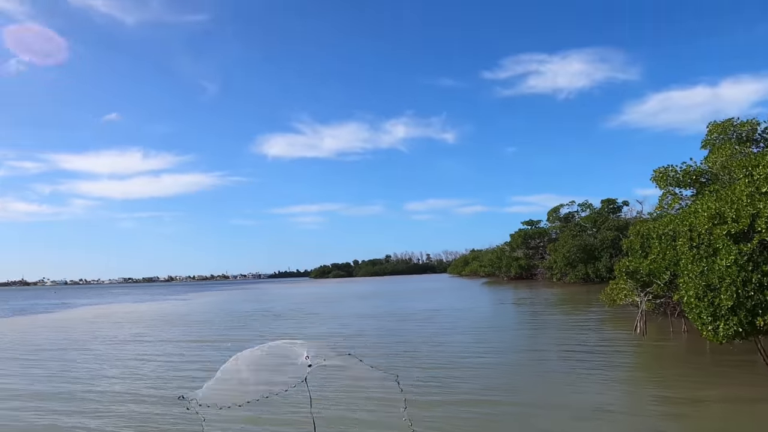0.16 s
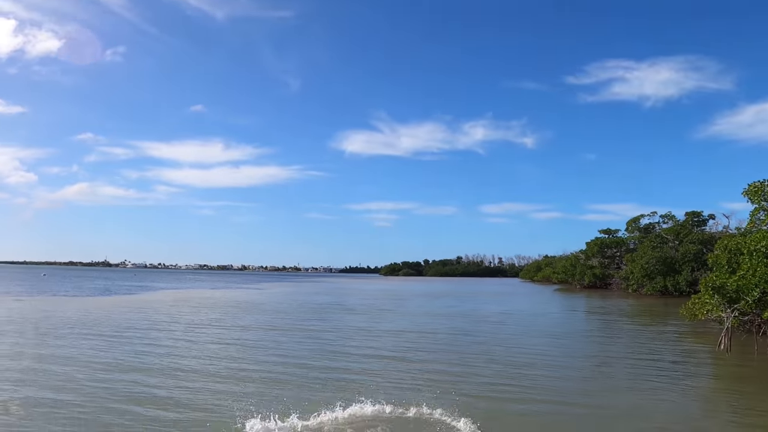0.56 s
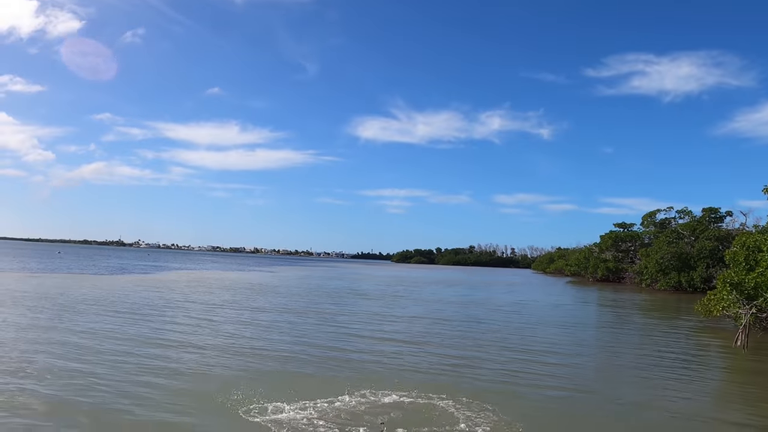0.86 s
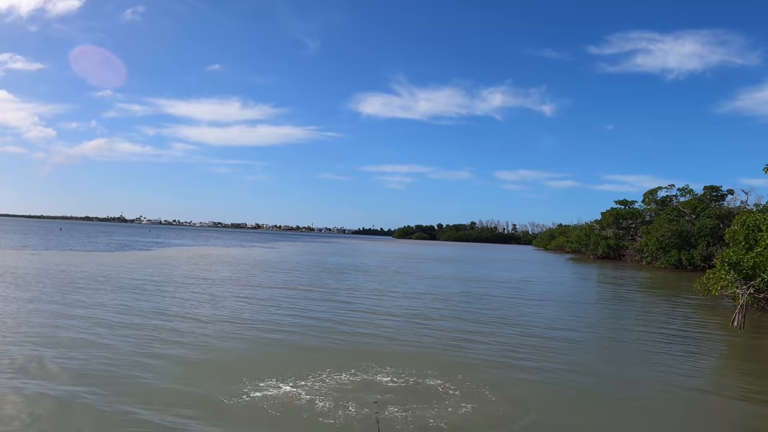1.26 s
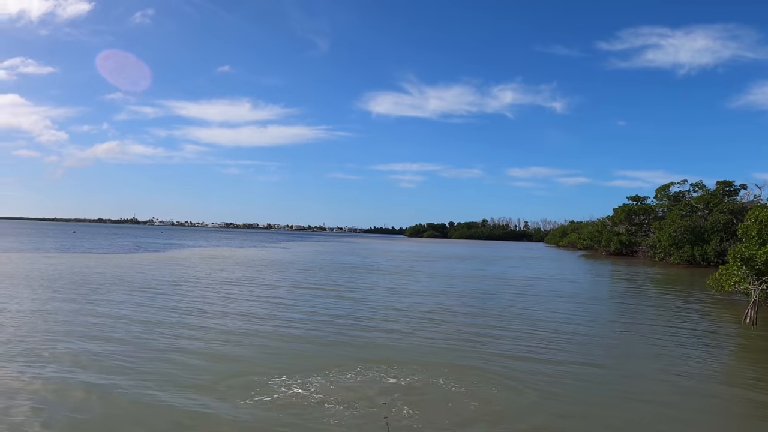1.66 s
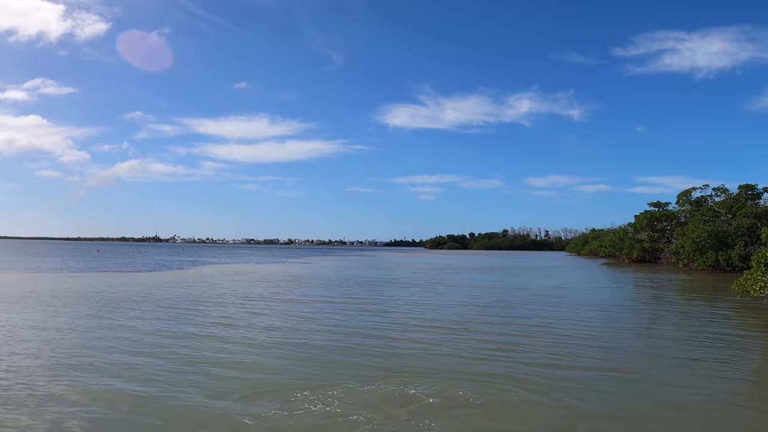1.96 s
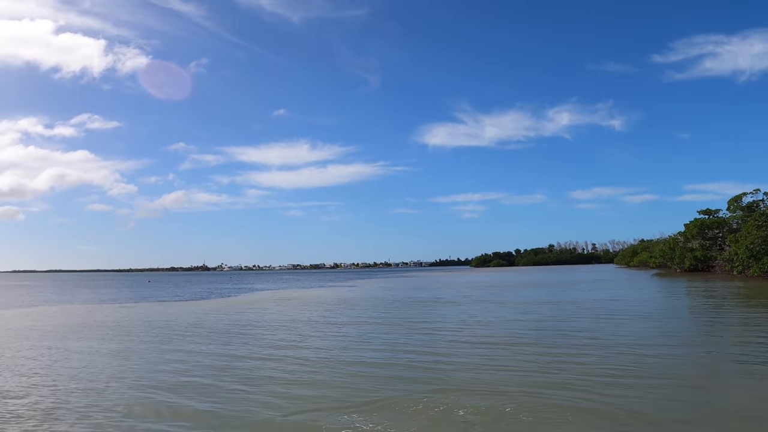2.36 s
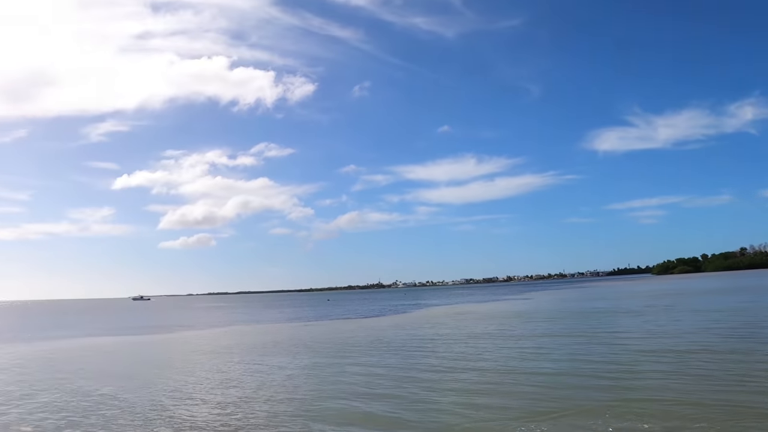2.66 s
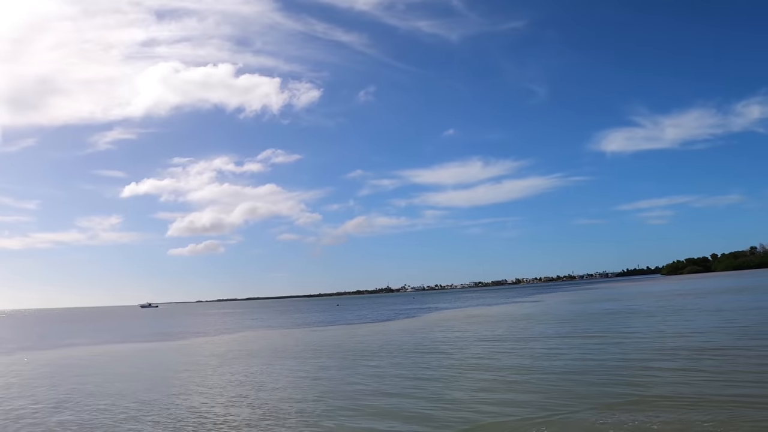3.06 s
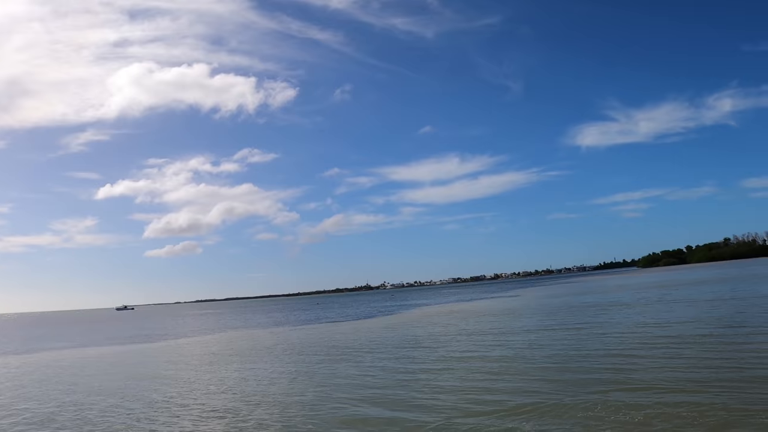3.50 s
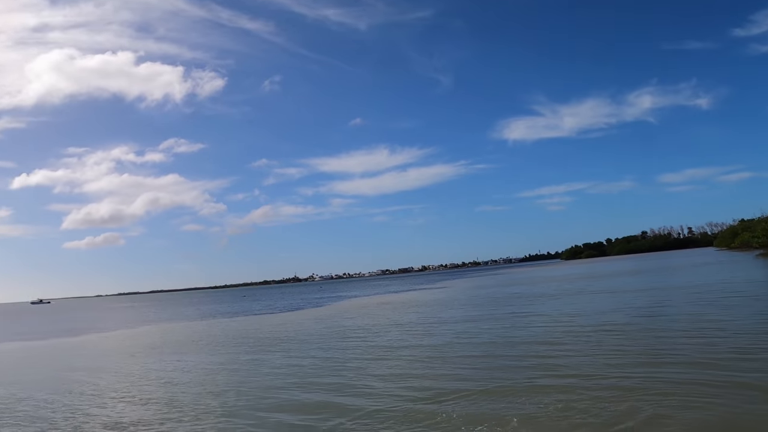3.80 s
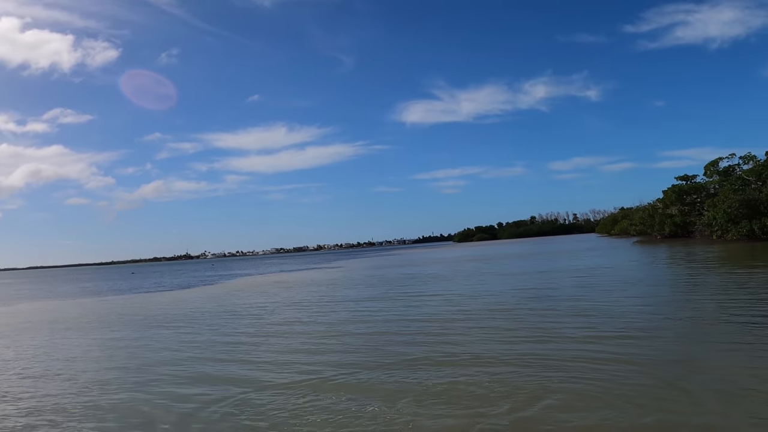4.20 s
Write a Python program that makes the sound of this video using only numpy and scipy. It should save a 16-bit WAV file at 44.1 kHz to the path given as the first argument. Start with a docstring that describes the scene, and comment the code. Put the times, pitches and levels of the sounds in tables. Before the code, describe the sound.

A weighted cast net slaps onto shallow water with a gulping splash, spray patters back, then a wet line drips and ticks close by.

```python
"""Cast net on a shallow bay

A wet hand line rubs by stick-slip as it runs out; a weighted rim then slaps the water (shaped noise and short tones).
Air pockets gulp as pulsating bubbles, spray rains back as random grains, and foam fizzes away.
Afterwards the line drips, squelches and ticks close by: gliding tones and filtered noise bursts.
Behind it wavelets clop under the bow, ripples lap, and a light breeze rumbles on the microphone as low noise."""
import sys
import numpy as np
from scipy import signal
from scipy.io import wavfile
from scipy.ndimage import map_coordinates

SR = 44100
rng = np.random.default_rng(int(sys.argv[2]) if len(sys.argv) > 2 else 0)


def store_wav(level_fs):
    """Save 16-bit WAV to argv[1]."""
    pcm = np.round(np.clip(np.atleast_2d(level_fs), -1, 1) * 32767)
    wavfile.write(sys.argv[1], SR, pcm.T.astype(np.int16))


N = 191379
TIME = np.arange(N) / SR   # s


def from_db(db):
    """Level to amplitude: 20 dB is a factor of ten."""
    return 10 ** (np.asarray(db) / 20)


def rms_one(x):
    """Power normalisation: scale to unit rms."""
    return x / np.sqrt(np.mean(x ** 2) + 1e-20)


def at_hz(points, hz):
    """Spectral interpolation on a log-frequency axis."""
    f, value = np.transpose(points)
    return np.interp(np.log(hz), np.log(f), value)


def drift(rate):
    """Low-passed noise: a slow random modulation of unit spread, faster for a higher rate."""
    # computed at every 40th sample; the first 2000 values let the filter settle
    r = np.exp(-80 * np.pi * rate / SR)
    slow = signal.lfilter([1], [1, -2 * r, r * r], rng.standard_normal(N // 40 + 2002))[2000:]
    return np.interp(np.arange(N) / 40, np.arange(len(slow)), rms_one(slow))


def band(x, low, high):
    """Band-pass filtering with a maximally flat response."""
    sos = signal.butter(2, [low, min(high, .45 * SR)], "band", fs=SR, output="sos")
    return signal.sosfilt(sos, x + 1e-18)


def add(out, s, sound):
    """Superposition: mix a short sound in at time s."""
    i = max(int(s * SR), 0)
    out[i:i + len(sound)] += sound[:N - i]


def chance_times(gain, per_s):
    """Random arrivals: sample indices, per_s a second where the gain is highest, fewer where it is low."""
    return np.flatnonzero(rng.random(N) < per_s * gain / gain.max() / SR)


def envelope(s, rise, hold, fade_db_per_s):
    """Exponential decay: a gain that rises, holds and then fades evenly in dB."""
    return np.clip((TIME - s) / rise, 0, 1) * from_db(-fade_db_per_s * np.maximum(TIME - s - rise - hold, 0))


def swells(rows):
    """Bell-shaped modulation: the summed gain of swells (t/s, half length/s, level/dB)."""
    return sum(from_db(db) * np.exp(-((TIME - s) / half) ** 2) for s, half, db in rows)


def grains(per_s, spread_db):
    """Shot noise: random clicks of uneven size."""
    sizes = from_db(spread_db * np.minimum(rng.exponential(1, N), 4)) * rng.choice([-1, 1], N)
    return sizes * (rng.random(N) < per_s / SR)


# likeness of the left and right channels: (f/Hz, likeness, 1 = identical)
LIKENESS = [(30, 1), (2000, 1), (4000, 1), (9000, 0.98), (13000, 0.88)]


def texture(colour, patchy_db, flicker=12, per_s=None, spread_db=0):
    """Third-octave synthesis: stereo noise, or shot noise of per_s grains in the 1 kHz band; rms 1."""
    out = np.zeros((2, N))
    for hz in 1000 * 2 ** (np.arange(-17, 12) / 3):
        if not colour[0][0] <= hz <= colour[-1][0]:
            continue
        if per_s is None:
            drive = rng.standard_normal(N)
        else:
            drive = grains(per_s * np.sqrt(hz / 1000), spread_db)   # higher bands have more grains
        mid = rms_one(band(drive, hz / 2 ** (1 / 6), hz * 2 ** (1 / 6)))
        alike = np.clip(at_hz(LIKENESS, hz), 0, 1)
        side = np.sqrt(1 - alike) * np.roll(mid, N // 3) * [[1], [-1]]   # opposite sign in the two channels
        gain = np.sqrt(hz) * from_db(at_hz(colour, hz) + patchy_db * drift(flicker))
        out += gain * (np.sqrt(1 + alike) * mid + side)
    return rms_one(out)


def bubble(hz, swell, t60, rise):
    """Bubble resonance: it swells, rings and dies, its pitch rising by at most an octave near the surface."""
    t = TIME[:SR // 5]
    shape = (1 - np.exp(-(t / swell) ** 2)) * from_db(-60 * t / t60)
    pitch = hz * 2 ** np.minimum(rise * t, 1)
    return shape / shape.max() * np.sin(2 * np.pi * np.cumsum(pitch) / SR)


# stretches of the weighted rim hitting the water: (t/s, relative level/dB, length/s)
SLAPS = [(0.452, -21.5, 0.015), (0.467, -19.5, 0.033), (0.501, -27.5, 0.028), (0.527, -21.3, 0.034),
         (0.55, -25.5, 0.028), (0.578, -25.7, 0.023), (0.606, -30, 0.015)]
SLAP_SPRAY_DECAY_S = 0.025


def rim_impact():
    """Impact excitation: gains of the rim's slaps and of the spray each one tears off."""
    impact, torn = np.zeros(N), np.zeros(N)
    for s, db, length in SLAPS:
        age = np.maximum(TIME - s, 0)
        onset = from_db(db) * (1 - np.exp(-age / .002))
        impact += onset * np.exp(-(age / length) ** 4)
        torn += onset * np.exp(-age / SLAP_SPRAY_DECAY_S)
    return impact, torn


# spectrum of a slap: (f/Hz, relative density level/dB)
SLAP_COLOUR = [(110, -37), (180, -2), (209, -14), (256, 3), (325, -0.5), (480, -2.5), (645, 1), (777, -3.5),
               (1150, -6.5), (1500, -11.5), (2190, -15.5), (2900, -18), (4420, -28), (7700, -32.5),
               (8930, -26.5), (15000, -79)]


def rim_slaps(impact):
    """Broadband impact noise: the rim slaps down stretch by stretch."""
    return from_db(-4.0) * impact * texture(SLAP_COLOUR, patchy_db=3.0, per_s=2000, spread_db=1.5)


WEIGHTS_PER_S, WEIGHT_DB = 520, -4   # rate at the hardest impact; level relative to the impact gain
WEIGHT_HZ, WEIGHT_OCTAVES = 1300, 0.8   # centre; pitches lie up to 1.5 times this spread either side


def weights(impact):
    """Damped resonance: each lead weight punches its own small hole, a short plop of a few cycles."""
    out, t = np.zeros(N), TIME[:SR // 25]
    cycles = 2.2
    for i in chance_times(impact, WEIGHTS_PER_S):
        hz = WEIGHT_HZ * 2 ** (WEIGHT_OCTAVES * rng.uniform(-1.5, 1.5))
        plop = np.exp(-t * hz / cycles) * np.sin(2 * np.pi * hz * t)
        add(out, i / SR, impact[i] * rng.uniform(0.39, 1) * plop)
    return from_db(WEIGHT_DB) * out


# air pockets dragged under by the net: (t/s, f/Hz, relative peak level/dB, t60/s)
GULPS = [(.453, 587, -26.5, 0.023), (.467, 645, -24.5, .05), (.483, 1170, -23.5, 0.061),
         (.509, 346, -21.5, 0.027), (.528, 405, -23, .055), (0.550, 337, -21, 0.088), (.562, 488, -27, .06),
         (.583, 575, -22.5, 0.058), (.586, 1126, -23.5, 0.037), (0.607, 430, -23.5, .055),
         (.67, 620, -31, .03), (0.65, 205, -18, 0.03), (.696, 224, -17, 0.026), (0.71, 150, -26, 0.03),
         (.72, 1050, -25, 0.03), (.747, 900, -21.5, 0.024), (.77, 520, -32, .03), (.824, 1080, -30, .022),
         (.785, 186, -33, 0.045), (.839, 240, -33, 0.037), (.89, 367, -37, 0.044),
         (1.089, 1080, -35, 0.037)]
GULP_SWELL_CYCLES, GULP_OCTAVES_PER_S = 1.28, 1.2   # bigger pockets are slower


def gulps(wobble=0.05, rough_db=2.0):
    """Bubble resonance: big air pockets ring unevenly; the lower the note, the slower it swells."""
    out = np.zeros(N)
    for s, hz, db, t60 in GULPS:
        pitch = hz * (1 + wobble * drift(66)[:SR // 5])
        rough = rough_db * drift(87)[:SR // 5]
        add(out, s, from_db(db + rough) * bubble(pitch, GULP_SWELL_CYCLES / hz, t60, GULP_OCTAVES_PER_S))
    return from_db(-0.5) * out


# spectra of the bubbles and of the fine spray: (f/Hz, relative density level/dB)
BUBBLE_COLOUR = [(100, -22), (170, -4.5), (227, -7), (407, -3.5), (480, -1), (904, -1.5), (1440, -4.5),
                 (1720, -8.5), (3500, -17.5), (4550, -49), (7700, -120)]
SPRAY_COLOUR = [(1000, -27), (1700, -2.5), (2360, -6.5), (2900, -4.7), (4230, -11), (5260, -17),
                (7110, -17), (7710, -21.5), (8920, -21.5), (11000, -29.5), (15000, -53)]
SKIM_S, SKIM_HOLD_S = 0.382, 0.025   # the lowest weights skim the surface ahead of the rim
SKIM_BUBBLE_DB, SKIM_SPRAY_DB = -37.5, -36.5   # its gurgle and hiss, relative levels
SLAP_SPRAY_DB = -10   # spray torn off by each slap, relative level
FALLBACK_S, FALLBACK_RISE_S = 0.585, 0.1   # the thrown water starts to rain back
PATTER_DB, PATTER_HOLD_S, PATTER_FADE_DB_PER_S = -35.8, 0.11, 54   # bubbles that it makes
SPRAY_DB, SPRAY_HOLD_S, SPRAY_FADE_DB_PER_S = -41.5, 0.19, 50   # its fine spray, relative level


def bubbles_and_spray(torn, skim_fade_db_per_s=130, churn_db=-13):
    """Shot noise: the skim, the slaps and the falling water each make fine bubbles and spray."""
    skim = envelope(SKIM_S, .014, SKIM_HOLD_S, skim_fade_db_per_s)
    patter = from_db(PATTER_DB) * envelope(FALLBACK_S, FALLBACK_RISE_S, PATTER_HOLD_S, PATTER_FADE_DB_PER_S)
    mist = from_db(SPRAY_DB) * envelope(FALLBACK_S, FALLBACK_RISE_S, SPRAY_HOLD_S, SPRAY_FADE_DB_PER_S)
    bubble_gain = from_db(SKIM_BUBBLE_DB) * skim + from_db(churn_db) * torn + patter
    spray_gain = np.hypot(from_db(SKIM_SPRAY_DB) * skim, from_db(SLAP_SPRAY_DB) * torn) + mist
    bubbles = bubble_gain * texture(BUBBLE_COLOUR, patchy_db=1.5, flicker=25, per_s=220, spread_db=2.0)
    spray = spray_gain * texture(SPRAY_COLOUR, patchy_db=1.2, flicker=25, per_s=170, spread_db=1.6)
    return bubbles + from_db(-2.5) * spray


# heavy drops are thrown highest and start to land later than the spray
HEAVY_S, HEAVY_RISE_S, HEAVY_HOLD_S, HEAVY_FADE_DB_PER_S = 0.62, 0.1, 0.17, 55
HEAVY_PER_S, HEAVY_DB, HEAVY_HZ, HEAVY_OCTAVES = 520, -35.8, 1750, 0.85


def heavy_drops(spread_db=3.5):
    """Damped resonance: heavy drops rain back, each a short plip; on average later ones sound lower."""
    cycles, deepening_octaves_per_s = 2.5, 0.8
    out, t = np.zeros(N), TIME[:SR // 40]
    shower = envelope(HEAVY_S, HEAVY_RISE_S, HEAVY_HOLD_S, HEAVY_FADE_DB_PER_S)
    for i in chance_times(np.sqrt(shower), HEAVY_PER_S):
        size, strength = np.clip(rng.standard_normal(2), -2, 1.5)
        deepening = deepening_octaves_per_s * (i / SR - HEAVY_S - HEAVY_RISE_S)
        hz = HEAVY_HZ * 2 ** (HEAVY_OCTAVES * size - deepening)
        age = t * hz / cycles
        plip = (1 - np.exp(-3 * age)) * np.exp(-age) * np.sin(2 * np.pi * hz * t)
        add(out, i / SR, shower[i] ** 0.75 * from_db(spread_db * strength) * plip)
    return from_db(HEAVY_DB) * out


# spectrum of the foam: (f/Hz, relative density level/dB)
FOAM_COLOUR = [(1180, -31), (2000, -4), (2760, -3.5), (5100, -2), (6090, 1), (7770, -1.5), (8750, 2.5),
               (9920, -5.5), (13400, -13.5), (15000, -26)]
FOAM_S, FOAM_RISE_S, FOAM_HOLD_S, FOAM_DB, FOAM_FADE_DB_PER_S = 0.93, 0.3, 0.4, -67.5, 10


def foam(fizz_per_s=1500):
    """Dense shot noise: the foam left behind fizzes and fades."""
    gain = from_db(FOAM_DB) * envelope(FOAM_S, FOAM_RISE_S, FOAM_HOLD_S, FOAM_FADE_DB_PER_S)
    return gain * texture(FOAM_COLOUR, patchy_db=-0.1, per_s=fizz_per_s, spread_db=1.5)


# the line slips through the hand in jerks: (t/s, relative peak level/dB)
RUBS = [(0.026, -37.5), (0.081, -35.5), (0.113, -32), (0.122, -32), (0.13, -29), (0.14, -30.5),
        (0.179, -29), (0.195, -28), (0.206, -28.5), (0.211, -31), (0.219, -35), (0.326, -41), (0.353, -32),
        (2.074, -46), (2.088, -42)]
# between jerks the line drags on: (t/s, half length/s, relative level/dB)
DRAGS = [(0.103, 0.012, -46), (0.14, 0.014, -41), (0.185, 0.016, -41), (0.211, 0.014, -38),
         (2.124, 0.012, -58)]
# modes of the taut line's creak: (f/Hz, level relative to its jerk/dB, t60/s)
CREAK = [(270, -7, 0.04), (580, -6, 0.035), (1050, -13, 0.04), (1370, -7, 0.04), (1760, -11, 0.04)]
# spectrum of the scrape: (f/Hz, relative density level/dB)
RUB_COLOUR = [(160, 8), (250, 5), (450, 4), (700, -5), (1100, -3), (1600, -4.5), (2100, -21), (4000, -27.5),
              (7000, -26), (12000, -55)]


def line_rubs(decay=0.0055, swell=0.001, scrape_db=-0.5, creak_db=0, detune=0.035):
    """Stick-slip friction: the line drags and slips in short rough jerks, each exciting damped creaky modes."""
    jerks, creak, t = np.zeros(N), np.zeros(N), TIME[:SR // 12]
    onset = 1 - np.exp(-(t / swell) ** 2)
    for s, db in RUBS:
        add(jerks, s, from_db(db) * onset * np.exp(-t / decay))
        for hz, mode_db, t60 in CREAK:
            phase = 2 * np.pi * (hz * rng.normal(1, detune) * t + rng.random())
            ringing = onset * np.exp(-np.log(1000) * t / t60)
            add(creak, s, from_db(db + mode_db) * ringing * np.sin(phase))
    scrape = np.hypot(jerks, swells(DRAGS)) * texture(RUB_COLOUR, patchy_db=0.5)
    return from_db(scrape_db) * scrape + from_db(creak_db) * creak


# pulls that gather the wet line: (t of fastest pull/s, half length/s, relative level/dB)
PULLS = [(2.69, 0.13, -65), (2.98, 0.071, -70), (3.64, 0.11, -66.5), (3.96, 0.14, -61.5),
         (4.21, 0.084, -65)]
HELD_LINE_DB = -80.5   # the line creeps between pulls, relative level


def pulling():
    """Amplitude control by sliding: a slow creep with pulls on top."""
    return swells(PULLS) + from_db(HELD_LINE_DB) * np.interp(TIME, [2.2, 2.5], [0, 1])


# the sharpest wet ticks of the line: (t/s, relative peak level/dB, f/Hz, bandwidth as a ratio, at least 1.1)
TICKS = [(0.258, -37, 4300, 1.25), (1.929, -53, 2300, 2.1), (2.211, -49, 1800, 1.6),
         (2.468, -53.5, 4550, 1.15), (2.487, -47.5, 7500, 1.4), (2.632, -50, 2960, 1.4),
         (2.667, -49, 5160, 0.82), (2.687, -49.5, 7500, 1.2), (2.712, -50, 5500, 1),
         (2.732, -48, 6560, 1.6), (2.89, -56.5, 4500, 1.5), (2.939, -42, 2950, 1.22),
         (2.958, -54.5, 5500, 1.6), (3.674, -51.5, 4200, 1.23), (3.851, -48, 3330, 1.3),
         (3.857, -43.5, 3450, 1), (3.883, -44.5, 3020, 2), (3.924, -42.5, 5000, 1.6),
         (3.957, -45, 3600, 1.4), (3.981, -47, 3700, 1.5), (4.02, -45.5, 3600, 1.7),
         (4.046, -50, 4200, 1.4), (4.066, -53, 3500, 1.5), (4.079, -51.5, 5000, 1.2),
         (4.152, -36.5, 3600, 2.2), (4.16, -43.5, 6980, 1.5), (4.193, -45.5, 3430, 1.25),
         (4.228, -43, 3400, 2.3), (4.29, -52, 1800, 1.5)]
# spectrum of the wet line and mesh: (f/Hz, relative density level/dB)
GATHER_COLOUR = [(700, -4), (1300, 7.5), (1900, -8), (2900, 1.5), (5000, -7), (7000, -9.5), (9500, -11.5),
                 (14000, -37)]
PULL_TICKS_PER_S, PULL_TICK_DB = 75, 7   # rate at full pull; level above the pulling gain
TICK_RING_DB, TICK_RING_HZ, TICK_RING_T60_S = -15, 1230, 0.03   # each tick leaves a short hollow ring


def wet_line(swell=0.00036, decay=0.00084, tail_db=-25, tail=0.011, snap_db=-15,
             small_tick_hz=3900, small_tick_width=1.45):
    """Impulsive excitation: films of water snap on the line, single ticks over a fine crackling hiss."""
    out, t, pull = np.zeros(N), TIME[:SR // 20], pulling()
    hiss = pull * texture(GATHER_COLOUR, patchy_db=4.0, flicker=28.0, per_s=400, spread_db=2.5)
    small = []
    for i in chance_times(pull, PULL_TICKS_PER_S):
        db = 20 * np.log10(pull[i]) + PULL_TICK_DB
        small.append((i / SR, db, small_tick_hz * 2 ** rng.uniform(-0.47, 0.81), small_tick_width))
    shape = (1 - np.exp(-(t / swell) ** 2)) * (np.exp(-t / decay) + from_db(tail_db) * np.exp(-t / tail))
    ring_shape = from_db(TICK_RING_DB) * np.exp(-np.log(1000) * t / TICK_RING_T60_S)
    for s, db, hz, width in list(TICKS) + small:
        burst = rng.standard_normal(len(t)) * shape
        ratio = max(width, 1.1)
        tick = band(burst, hz / ratio, hz * ratio) + from_db(snap_db) * band(burst, 1040, 10000)
        ring = ring_shape * np.sin(2 * np.pi * TICK_RING_HZ * rng.normal(1, 0.073) * t)
        add(out, s, from_db(db) * (tick / np.abs(tick).max() + ring))
    return out + from_db(-2.0) * hiss


# partials of a short squeaky squelch, each gliding, then late swelling drips that chirp upward:
# (t/s, length/s, start f/Hz, end f/Hz, relative level/dB)
SQUELCH = [(2.259, 0.031, 548, 720, -44.5), (2.26, 0.04, 1090, 1750, -46.5),
           (2.272, 0.038, 1500, 2050, -52.5), (2.29, 0.022, 850, 1080, -41),
           (2.303, 0.027, 1350, 1620, -44.5), (2.308, 0.018, 1020, 940, -45.5),
           (2.27, 0.036, 3250, 3780, -57.5), (2.297, 0.027, 3330, 3620, -56),
           (2.264, 0.06, 3000, 2920, -62), (2.268, 0.028, 4050, 4300, -63.5),
           (2.276, 0.04, 4700, 5080, -67), (2.292, 0.026, 5950, 6100, -68), (4.138, .026, 920, 1450, -55),
           (4.302, .027, 680, 1250, -54)]


def squelch_and_late_drips(waver=0.03, overtone_db=-26, rasp_db=-27, slosh_db=-11.5, slosh_decay_s=0.021,
                           fullness=0.7, sputter_db=2.5):
    """Frequency modulation: gliding tones swell and sputter, rasp on every cycle and leave a slosh."""
    out, t = np.zeros(N), TIME[:SR // 8]
    for s, length, start_hz, end_hz, db in SQUELCH:
        u = np.minimum(t / length, 1)
        pitch = start_hz * (end_hz / start_hz) ** u * (1 + waver * drift(260)[:len(u)])
        phase = 2 * np.pi * np.cumsum(pitch) / SR
        sputter = from_db(sputter_db * drift(160)[:len(u)]) * np.abs(np.sin(np.pi * u)) ** fullness
        rasp = rms_one(band(rng.standard_normal(len(u)), 2900, 6700) * (1 + np.sin(phase)))
        tone = np.sin(phase) + from_db(overtone_db) * np.sin(2 * phase)
        slosh_shape = u * np.exp(-np.maximum(t - length, 0) / slosh_decay_s)
        slosh = rms_one(band(rng.standard_normal(len(u)), 270, 1500)) * slosh_shape
        add(out, s, from_db(db) * (sputter * (tone + from_db(rasp_db) * rasp) + from_db(slosh_db) * slosh))
    return from_db(-1.2) * out


# drips whose bubble surfaces, mostly chirping upward:
# (t/s, f/Hz, peak level/dB, length/s, rise/octaves, lateness of the rise: 1 = even)
DRIPS = [(2.21, 1130, -50, 0.046, 1.0, 3), (2.632, 1240, -48, 0.022, -0.085, 0.79),
         (2.958, 1066, -54.5, 0.039, 0.86, 4.5), (3.053, 1196, -58.5, 0.039, 1.35, 2.7),
         (3.12, 1500, -60.5, 0.036, .55, 0.72), (3.985, 1190, -51, .04, .25, .7)]


def drips(fade_db=10, waver=0.032):
    """Frequency-modulated bubble resonance: a wobbly note, most often rising as it reaches the surface."""
    out = np.zeros(N)
    for s, hz, db, length, rise, lateness in DRIPS:
        u = np.linspace(0, 1, int(length * SR))
        flutter_db = 3.0 * drift(120)[:len(u)]
        edges = np.minimum(u / 0.027, 1) * np.minimum((1 - u) / 0.087, 1)
        shape = edges * from_db(db - fade_db * u + flutter_db)
        pitch = hz * 2 ** (rise * u ** lateness) * (1 + waver * drift(300)[:len(u)])
        add(out, s, shape * np.sin(2 * np.pi * np.cumsum(pitch) / SR))
    return out


# drops off the mesh and the line that ring a small bubble: (t/s, f/Hz, relative peak level/dB)
PLINKS = [(0.066, 2500, -44), (.257, 3800, -43), (.293, 3800, -48.5), (.327, 3320, -43), (0.346, 3200, -41),
          (1.93, 1490, -49.5), (2.165, 1500, -54), (2.502, 1950, -45), (2.675, 3900, -50),
          (2.713, 2000, -52), (3.578, 2300, -54.5), (3.582, 1200, -56), (3.65, 1200, -55),
          (3.752, 2500, -57), (3.811, 3180, -55), (3.858, 3300, -49), (3.906, 3000, -48.5),
          (3.915, 2800, -47.5), (4.011, 3800, -48), (4.021, 2400, -46.5), (4.023, 1950, -51),
          (4.045, 3200, -53), (4.057, 3450, -52), (4.255, 1110, -51.5), (4.295, 2140, -53)]
PLINK_T60_S, PLINK_SWELL_S, PLINK_OCTAVES_PER_S = 0.026, 0.0007, 10


def plinks(splat_db=-9, splat_s=0.0052):
    """Impact noise and bubble resonance: single drops splat and ring a quickly rising bubble."""
    out, t = np.zeros(N), TIME[:SR // 5]
    for s, hz, db in PLINKS:
        splat = rms_one(band(rng.standard_normal(len(t)), hz / 2 ** .5, hz * 2)) * np.exp(-t / splat_s)
        ring = bubble(hz, PLINK_SWELL_S, PLINK_T60_S, PLINK_OCTAVES_PER_S)
        add(out, s, from_db(db) * (ring + from_db(splat_db) * splat))
    return from_db(-1.5) * out


DROPS_PER_S, PULL_DROP_DB = 420, 3   # shed at full pull; level above the pulling gain
MESH_DROP_DB, FALLBACK_DROP_DB = -46, -43   # drops from the flying mesh and from the splash


def droplets(centre_hz=3000, spread_db=4.5, mesh_per_s=150, fallback_per_s=260):
    """Random damped resonances: mesh, splash and pulls shed drops of random size, each ringing a few cycles."""
    cycles = 3.5
    out, t = np.zeros(N), TIME[:SR // 25]
    falling = envelope(FALLBACK_S, FALLBACK_RISE_S, SPRAY_HOLD_S, SPRAY_FADE_DB_PER_S / 2)
    showers = [(from_db(MESH_DROP_DB) * in_flight(), mesh_per_s),
               (from_db(FALLBACK_DROP_DB) * falling, fallback_per_s),
               (from_db(PULL_DROP_DB) * pulling(), DROPS_PER_S)]
    for gain, per_s in showers:
        for i in chance_times(gain ** 1.5, per_s):
            size, glide, strength = rng.standard_normal(3)
            hz = centre_hz * 2 ** (0.715 * np.clip(size, -2, 2))
            age = t * hz / cycles
            pitch = hz * 2 ** ((.03 + .08 * glide) * np.minimum(age, 2))
            shape = (1 - np.exp(-3 * age)) * np.exp(-age)
            drop = shape * np.sin(2 * np.pi * np.cumsum(pitch) / SR)
            add(out, i / SR, gain[i] * from_db(spread_db * min(strength, 1.5)) * drop)
    return out


def in_flight(fade_db_per_s=300):
    """Amplitude control by flight: full from the throw until the weights touch, then a fast fade."""
    return envelope(0, 0.0028, SKIM_S, fade_db_per_s)


def net_in_flight(level_db=-55.5):
    """Shot noise: the wet mesh rustles until it lands."""
    return from_db(level_db) * in_flight() * texture(GATHER_COLOUR, patchy_db=0.5, per_s=1100, spread_db=4.5)


# wavelets clopping under the bow: (t/s, relative level/dB, start f/Hz, settled f/Hz, decay/s)
CLOPS = [(1.305, -46, 280, 280, 0.018), (1.5, -33, 610, 270, 0.016), (1.690, -44, 610, 255, 0.04),
         (1.819, -38, 570, 275, 0.038), (4.228, -48, 480, 430, 0.02)]
HOLLOW_HZ, HOLLOW_DB, HOLLOW_DECAY_S = 470, -12.5, 0.028   # the hollow under the bow answers each clop


def clops(fall_s=0.0072, sag=0.35, recover_s=0.016, swell_s=0.0018, wash_db=-16, wobble=0.05,
          splat_db=-16, splat_s=0.005):
    """Cavity resonance: a trapped pocket's note drops, then creeps up; the hollow under the bow answers."""
    out, t = np.zeros(N), TIME[:SR // 5]
    for s, db, start_hz, end_hz, decay in CLOPS:
        low_hz = end_hz * (1 - sag * np.exp(-t / recover_s))
        glide = low_hz + (start_hz - low_hz) * np.exp(-(t / fall_s) ** 4)
        pitch = glide * (1 + wobble * drift(170)[:len(t)])
        note = np.sin(2 * np.pi * np.cumsum(pitch) / SR) * np.exp(-t / decay)
        ring = from_db(HOLLOW_DB) * np.sin(2 * np.pi * HOLLOW_HZ * rng.normal(1, 0.03) * t)
        wash = from_db(wash_db) * rms_one(band(rng.standard_normal(len(t)), 164, 600))
        hollow = (ring + wash) * np.exp(-t / HOLLOW_DECAY_S)
        splat_noise = rms_one(band(rng.standard_normal(len(t)), 420, 1380))
        splat = from_db(splat_db) * splat_noise * np.exp(-t / splat_s)
        clop = (1 - np.exp(-t / swell_s)) * (note + hollow) + (1 - np.exp(-t / 0.00086)) * splat
        add(out, s, from_db(db) * clop)
    return out


# spectrum of the lapping water: (f/Hz, relative density level/dB)
RIPPLE_COLOUR = [(88, -38), (150, 0.5), (286, -7.5), (514, -9.5), (800, -16.5), (1220, -19), (1440, -15.5),
                 (1980, -26), (2440, -30), (5000, -55), (6500, -54), (11000, -120)]
RIPPLE_DB, WASH_DB, WASH_DECAY_S = -62.5, -52, 0.73   # calm water; extra lapping stirred by the throw


def ripples():
    """Shot noise with exponential decay: the bay laps, calming after the throw."""
    gain = from_db(RIPPLE_DB) + from_db(WASH_DB) * np.exp(-TIME / WASH_DECAY_S)
    return gain * texture(RIPPLE_COLOUR, patchy_db=1.0, per_s=400, spread_db=1.0)


# spectrum of the wind rumble: (f/Hz, relative density level/dB)
RUMBLE_COLOUR = [(11, -32), (18, -1), (43, 2), (92, 0.5), (118, -7.5), (146, -5), (177, -17), (257, -18.5),
                 (300, -18), (390, -58.5), (660, -120)]
# gusts on the microphone: (t/s, half length/s, relative level/dB)
GUSTS = [(0.36, 0.074, -36), (0.72, 0.06, -31.5), (1.42, 0.38, -41.5), (2.2, 0.022, -41), (2.36, 0.05, -50),
         (3.27, 0.083, -41), (3.85, 0.12, -48)]
# the microphone turns into the wind: (t/s, level of opposed buffeting relative to the rumble/dB)
CROSSWIND = [(0, -61), (2.7, -60), (3.3, -19.5), (3.8, -13.5), (4.34, -15)]
WIND_DB, THROW_WIND_DB, THROW_WIND_DECAY_S = -47, -31.5, 0.29   # steady breeze; air stirred by the throw


def breeze():
    """Turbulent pressure noise: wind buffets the microphone in gusts, partly opposed at the two ports."""
    throw_wind = from_db(THROW_WIND_DB) * np.exp(-TIME / THROW_WIND_DECAY_S)
    rumble = np.sqrt(from_db(WIND_DB) ** 2 + throw_wind ** 2 + swells(GUSTS) ** 2)   # powers add
    shared = texture(RUMBLE_COLOUR, patchy_db=1.5, flicker=5.4)
    s, db = np.transpose(CROSSWIND)
    opposed_gain = from_db(np.interp(TIME, s, db))
    opposed = opposed_gain * texture(RUMBLE_COLOUR, patchy_db=7.0, flicker=4.8) * [[1], [-1]]
    return rumble * (shared + opposed)


def off_centre(x, pan_db=1.5):
    """Interchannel level and time difference: as the microphone turns, the hands move off its axis."""
    turned = np.interp(TIME, [2.4, 3.5], [0, 1])
    left = map_coordinates(x[0], [np.arange(N) - turned], order=3)   # delayed by up to one sample
    return np.array([left, x[1]]) * from_db(pan_db * turned * [[.5], [-.5]])


def scene():
    """Superposition: the net lands straight ahead in open air; the line is handled close by."""
    impact, torn = rim_impact()
    splash = rim_slaps(impact) + weights(impact) + gulps() + bubbles_and_spray(torn) + heavy_drops() + foam()
    hands = line_rubs() + wet_line() + squelch_and_late_drips() + drips() + plinks() + droplets()
    background = net_in_flight() + clops() + ripples() + breeze()
    return splash + off_centre(hands) + background


def bell(x, hz, q, gain_db):
    """Resonant filtering: a peak or dip in the response."""
    return x + (from_db(gain_db) - 1) * signal.lfilter(*signal.iirpeak(hz, q, fs=SR), x)


CUTOFF_HZ = 15200


def record(dry):
    """Linear filtering: the microphone port has a notch and a resonance in the treble; the top is cut."""
    notched = bell(dry, hz=7840, q=9.1, gain_db=-8.0)
    coloured = bell(notched, hz=9000, q=9.2, gain_db=5.5)
    return signal.sosfilt(signal.ellip(10, .2, 80, CUTOFF_HZ, fs=SR, output="sos"), coloured)


dry = scene()
out = record(dry)
store_wav(out)
```